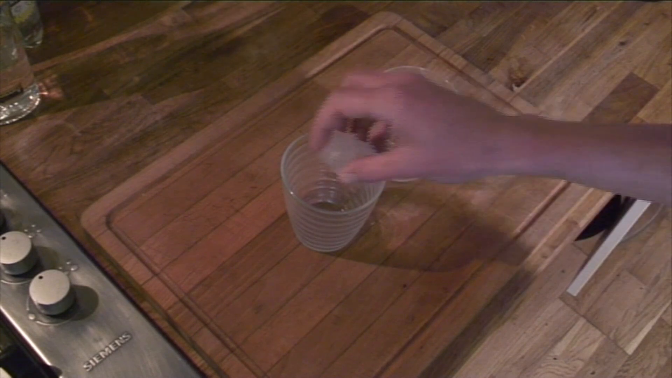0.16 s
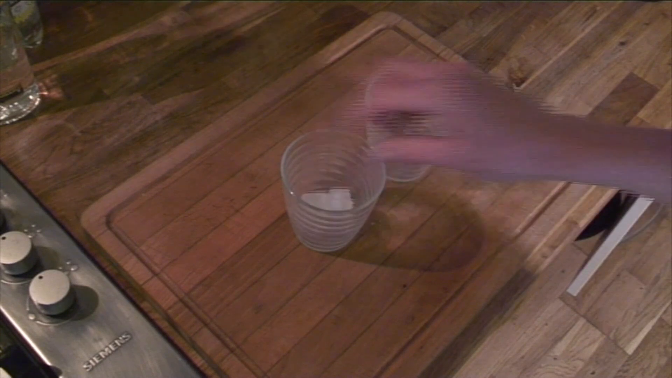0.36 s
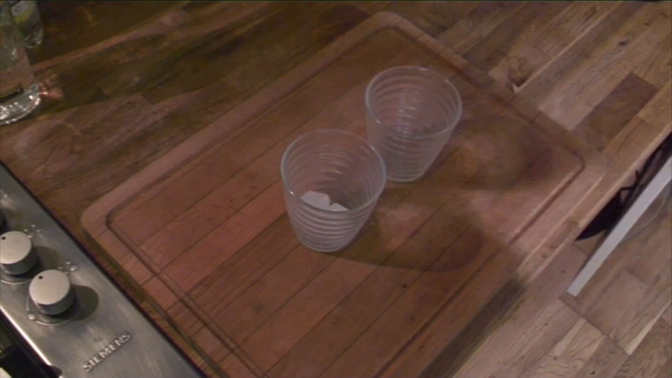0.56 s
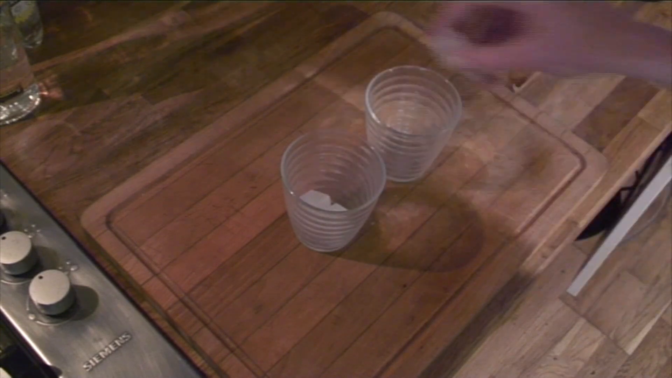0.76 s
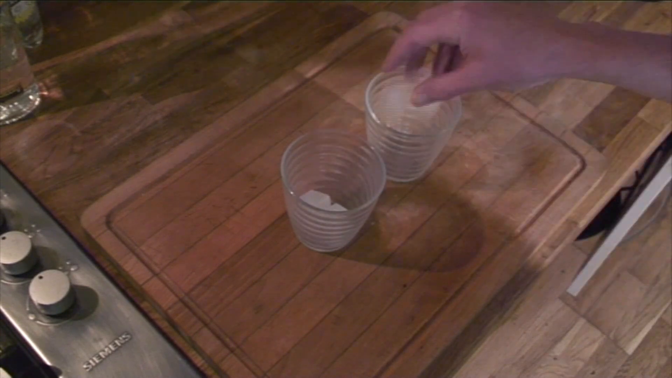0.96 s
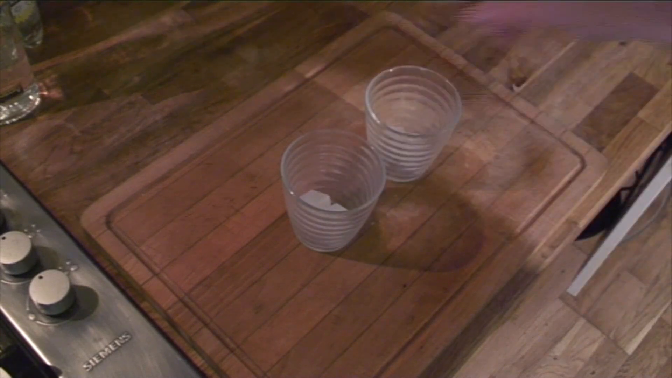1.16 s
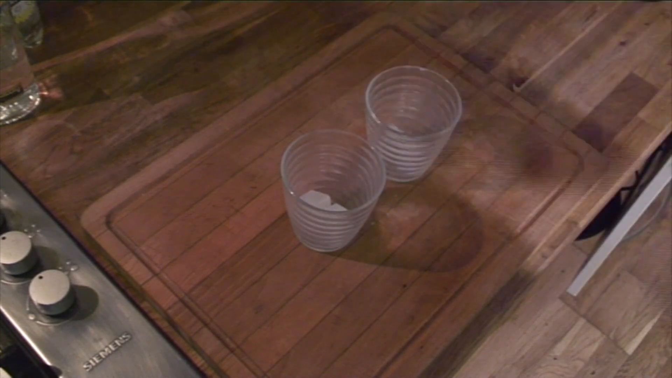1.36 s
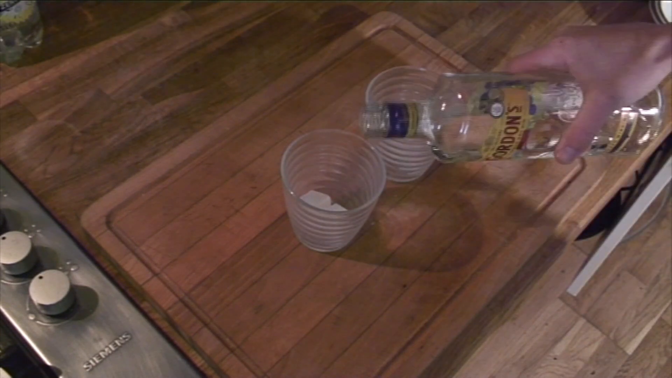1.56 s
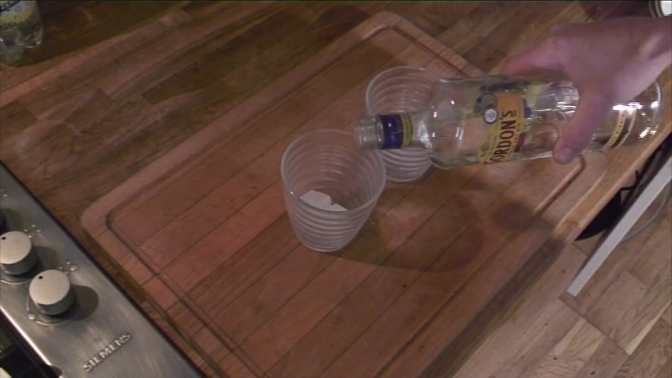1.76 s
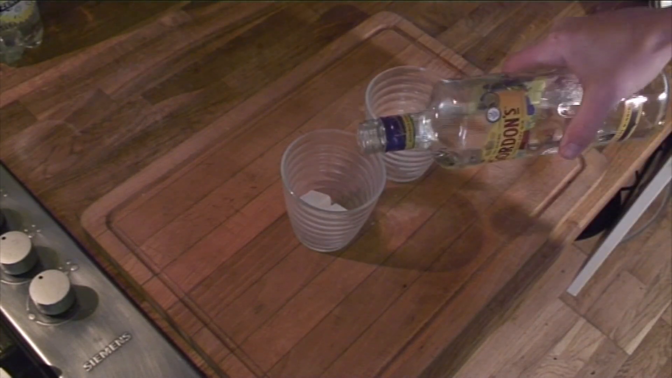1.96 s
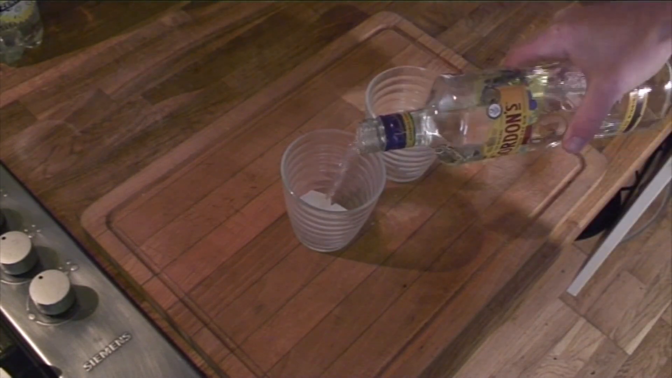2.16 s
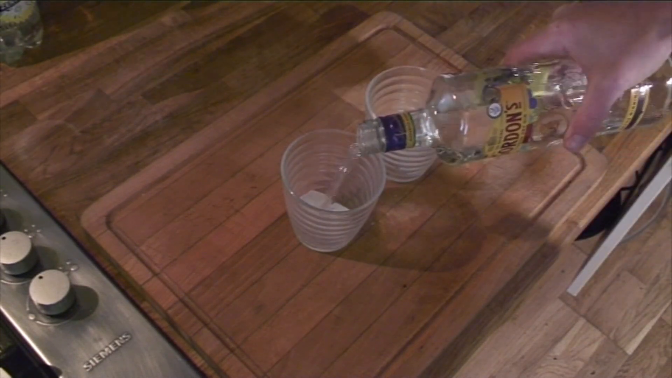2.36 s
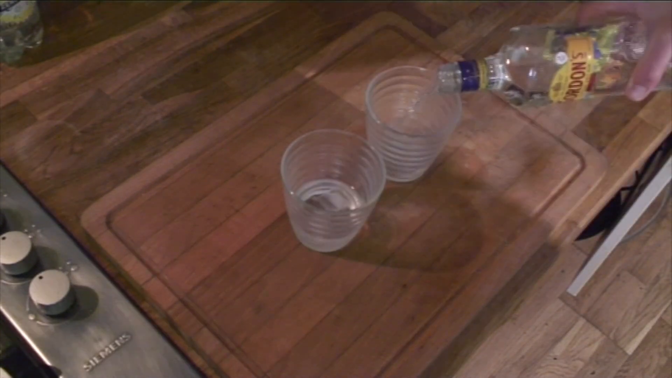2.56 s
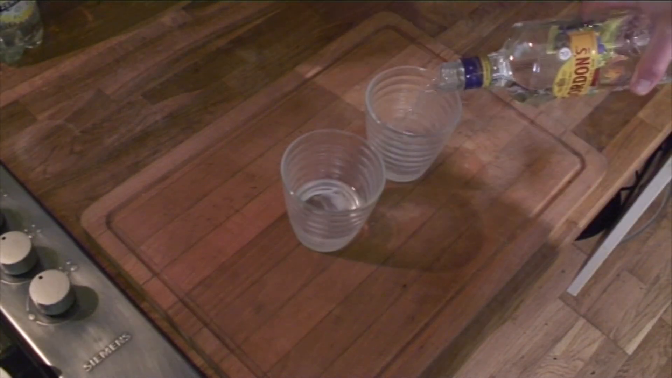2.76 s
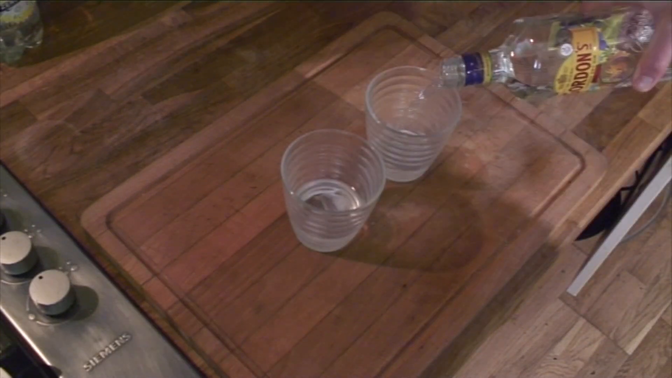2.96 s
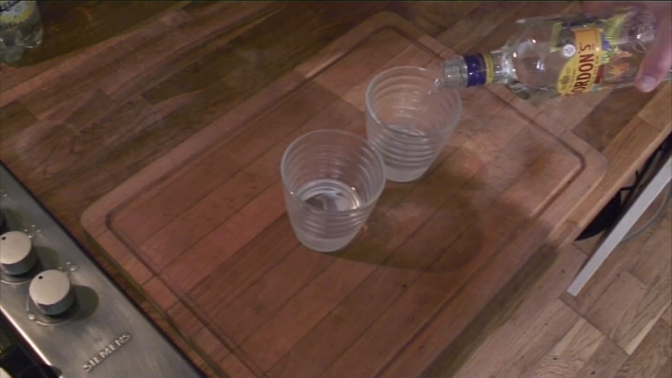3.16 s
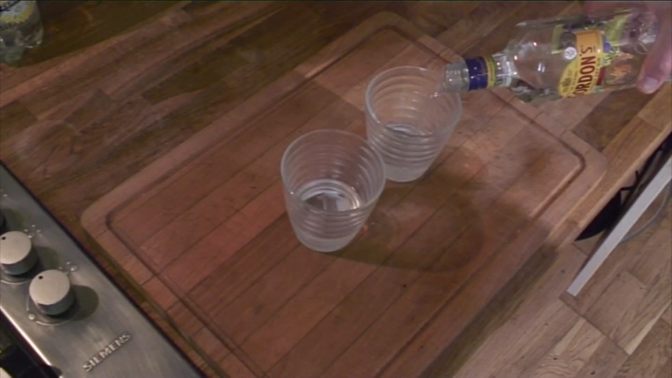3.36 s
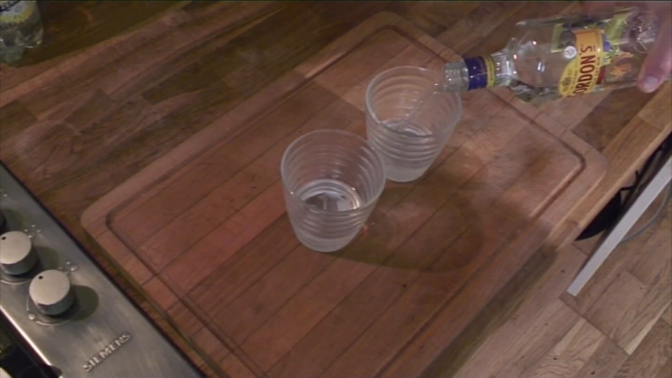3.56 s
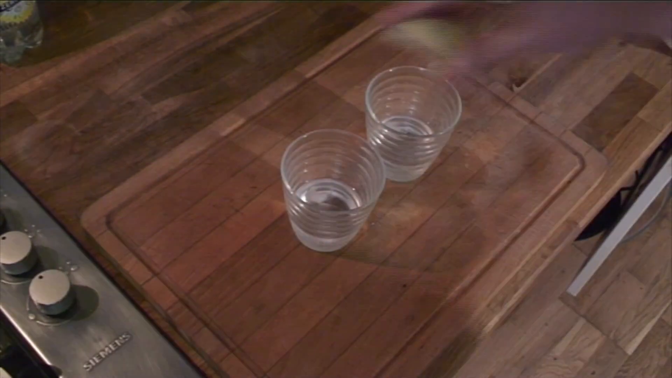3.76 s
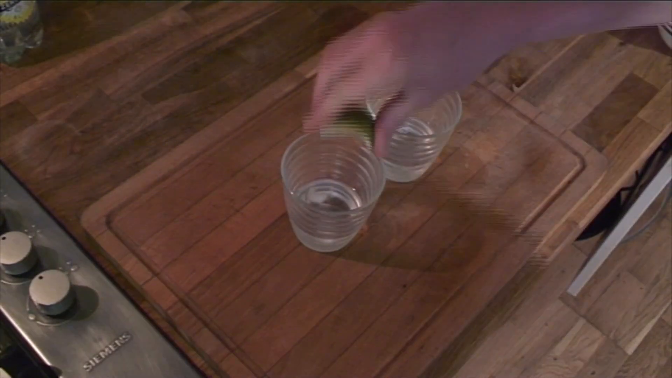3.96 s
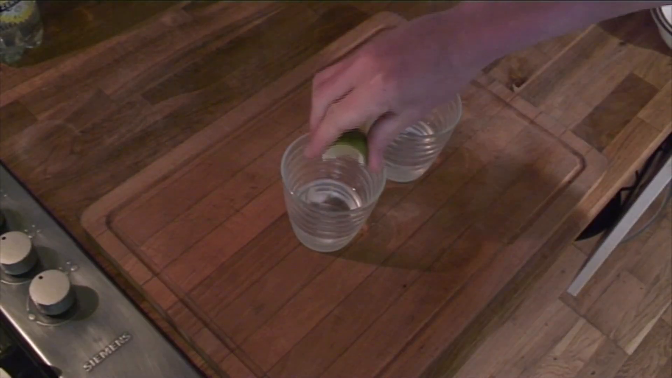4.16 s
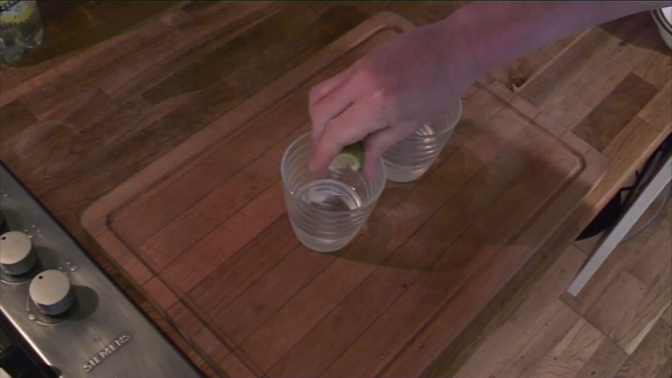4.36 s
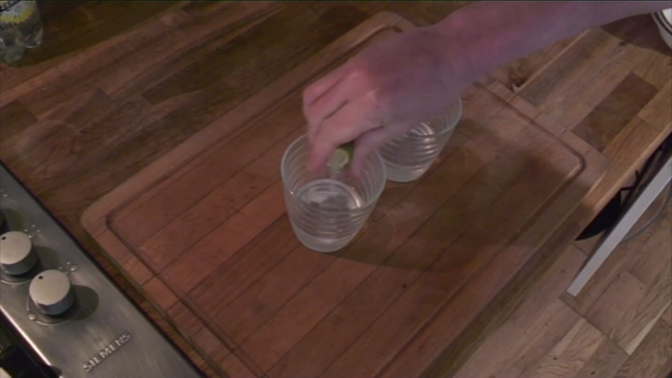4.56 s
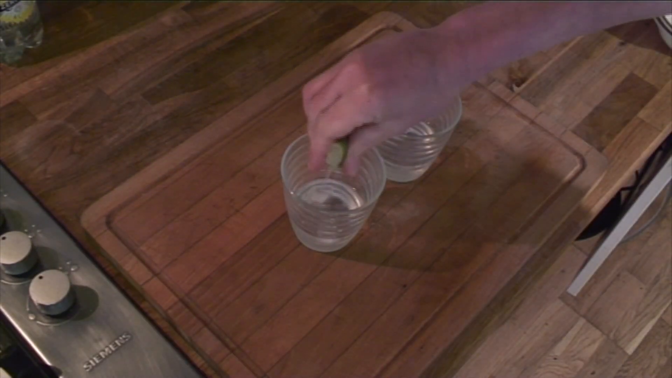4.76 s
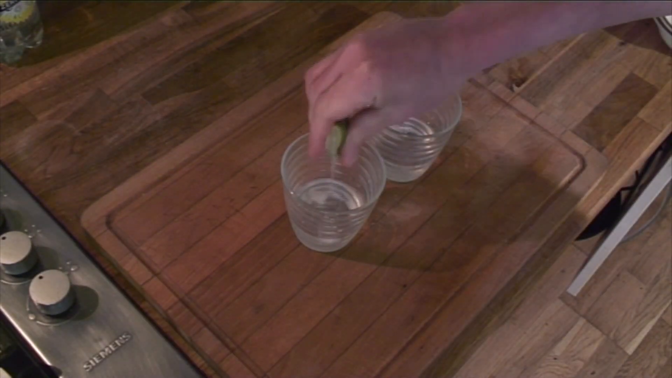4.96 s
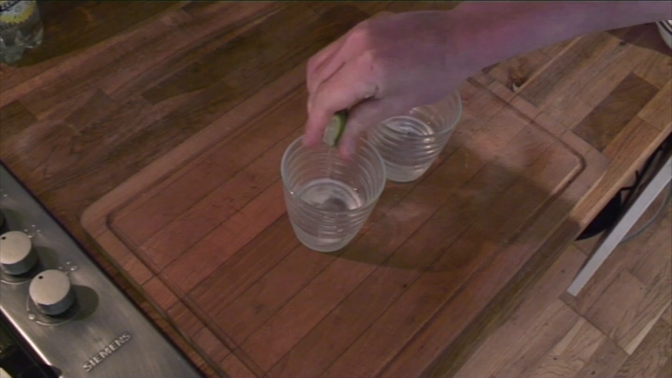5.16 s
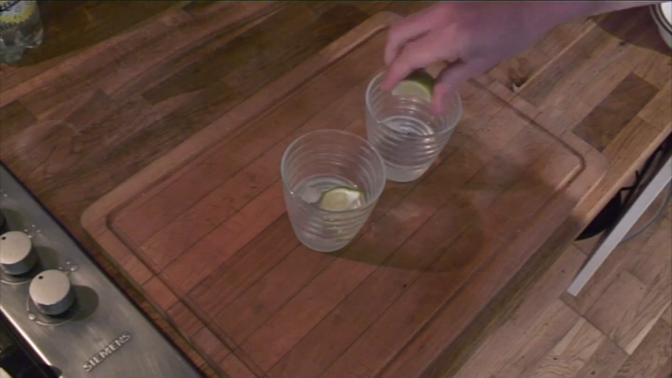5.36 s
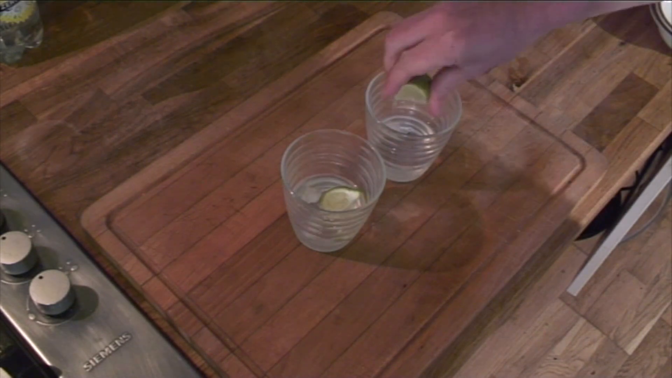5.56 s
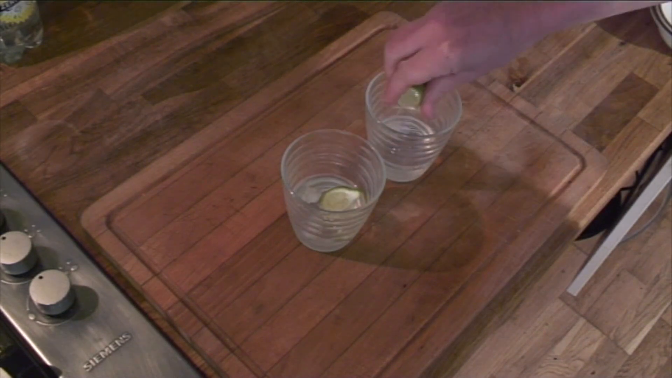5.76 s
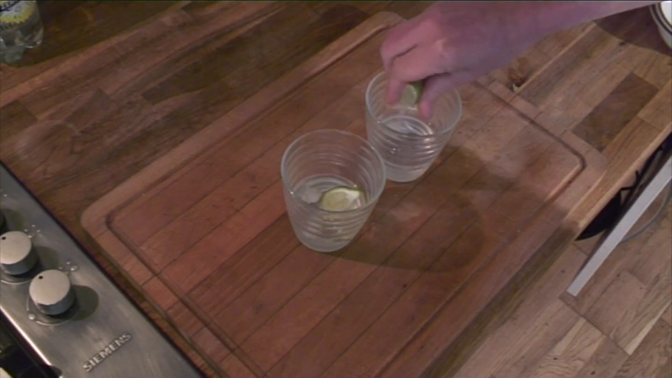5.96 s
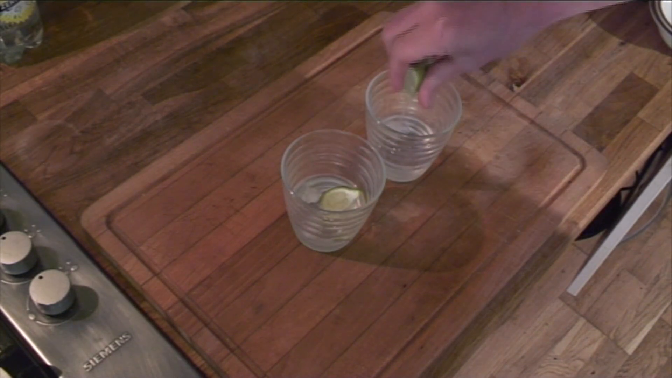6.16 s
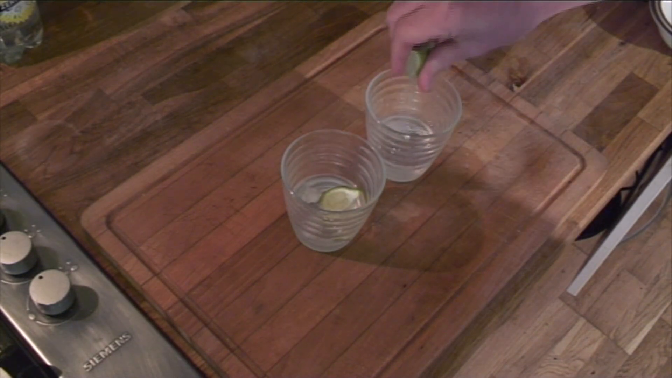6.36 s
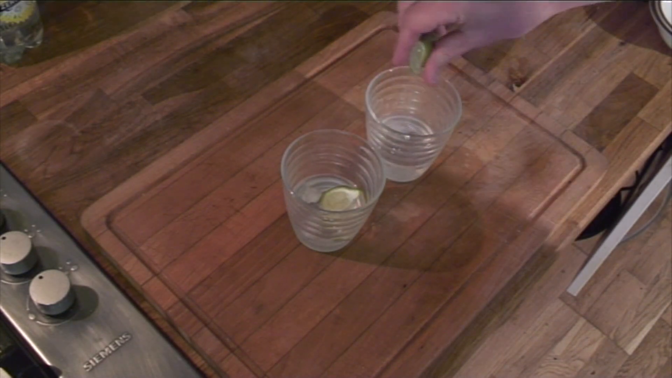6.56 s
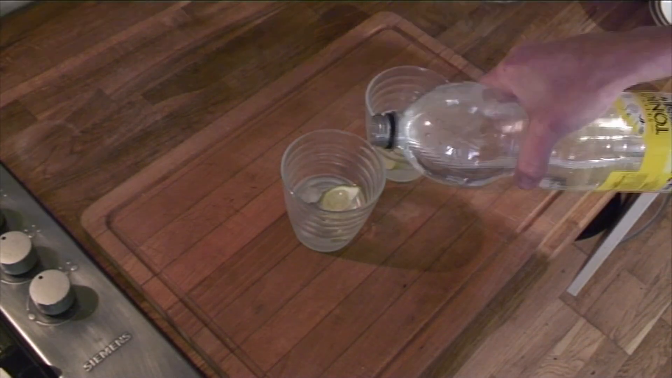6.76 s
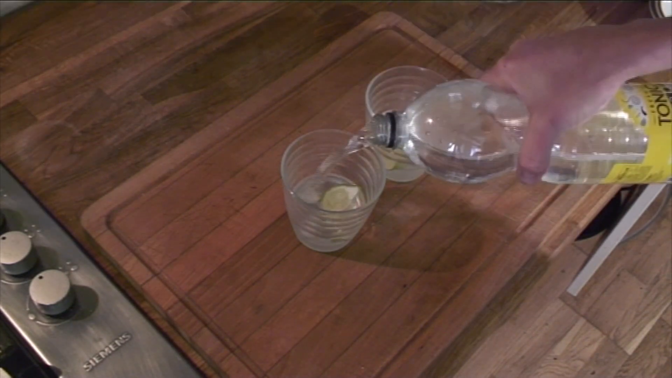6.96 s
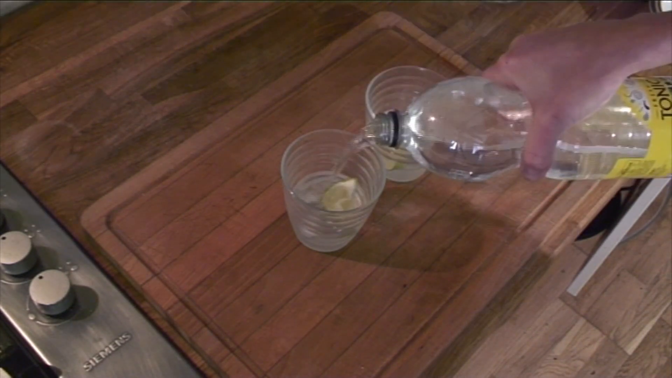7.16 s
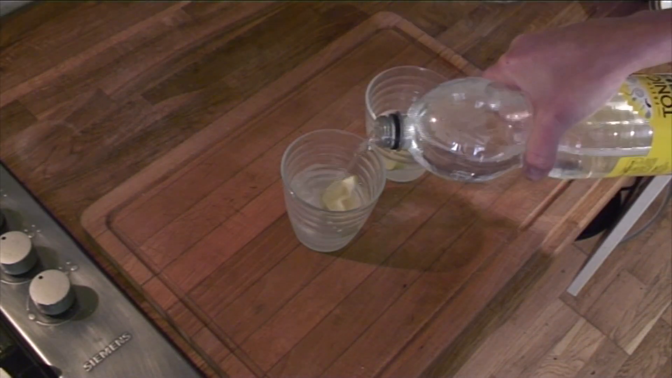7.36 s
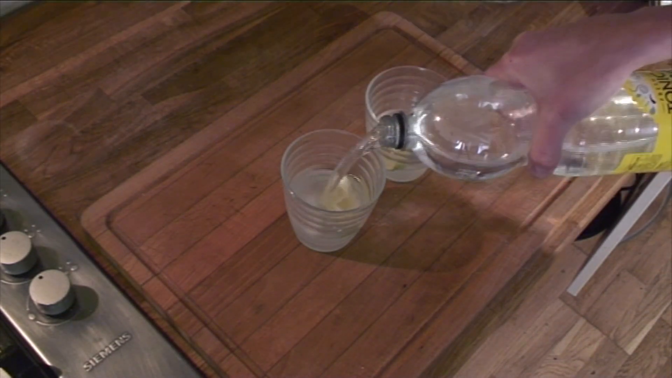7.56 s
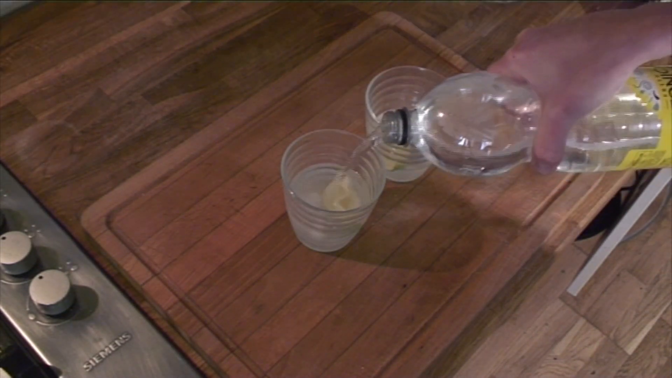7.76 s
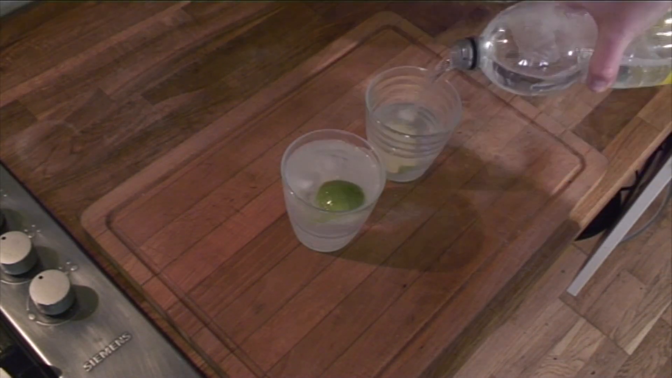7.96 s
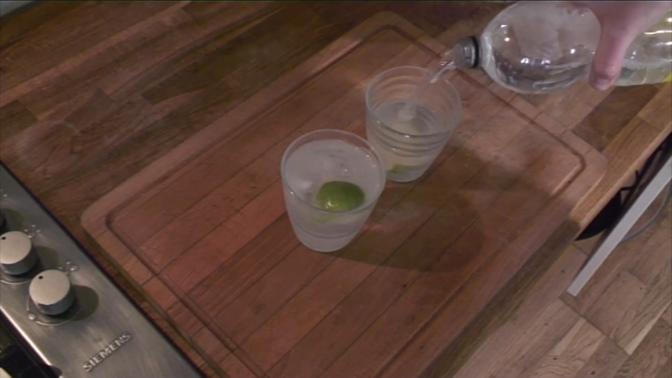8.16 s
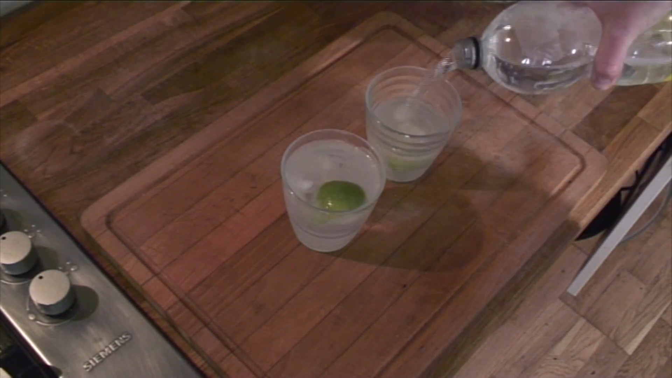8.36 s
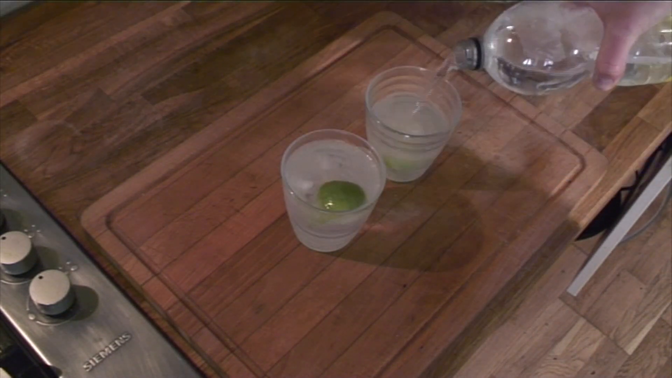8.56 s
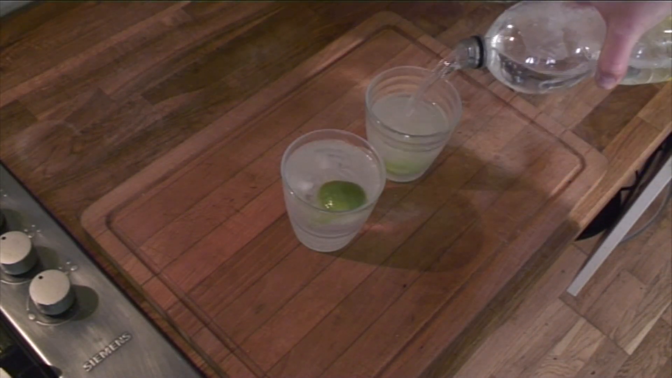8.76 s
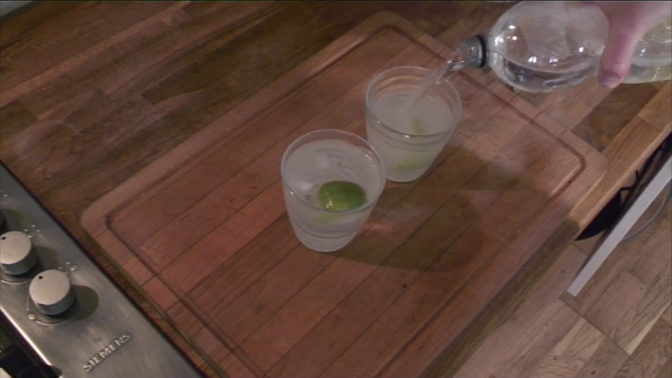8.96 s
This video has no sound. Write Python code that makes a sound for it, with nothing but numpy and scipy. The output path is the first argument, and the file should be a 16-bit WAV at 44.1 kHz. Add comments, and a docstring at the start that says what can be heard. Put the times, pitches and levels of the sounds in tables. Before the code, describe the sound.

Close in a small kitchen with a steady low fan rush and hum, ice rattles into one glass tumbler, then another, with bright, abruptly cut ringing. A bottle knocks twice on glass. Thin liquid trickles, soft scuffs and tiny wet lime ticks follow, then tonic gulps loudly into the first glass with fizz, and more gently into the second.

```python
"""Two drinks are mixed on a wooden board in a kitchen, heard close, over an appliance's rush and hum.
Ice cracks and rings the modes of the front tumbler, then the rear; a bottle knocks twice on the rear one.
Spirit trickles in as a swarm of bubbles, lime squirts in sparse ticks, and soft scuffs sound further off.
Last, two pours of tonic gulp, gurgle in the hollow glass and fizz; the second starts with a rising whistle.
One kitchen's echoes surround all but the appliance."""
import sys
import numpy as np
from scipy import signal
from scipy.fft import rfft, irfft
from scipy.io import wavfile

SR = 44100
rng = np.random.default_rng(int(sys.argv[2]) if len(sys.argv) > 2 else 0)


def inscribe(sig):
    """Save sig as 16-bit PCM at rate SR to the path in sys.argv[1].

    A 1-D sig is mono; a 2-D sig holds one channel per row.
    Samples are clipped to [-1, 1] before scaling.
    """
    pcm = np.round(np.clip(np.atleast_2d(sig).T, -1, 1) * 32767)
    wavfile.write(sys.argv[1], SR, pcm.astype(np.int16))


N = 401310
TIME = np.arange(N) / SR
RING = TIME[:SR // 2]  # the half second that any ring or room tail is given

# the bottle bumps the rear tumbler; all levels relative:
# [t/s, knock level/dB, crack level/dB, ring level/dB, ring brightness/dB per octave]
BOTTLE_KNOCKS = [(1.7901, 0, -20, -21, -4.5), (1.8860, 1, -15, -19, -4.5)]
# gulps of tonic slap into the glass: [t/s, peak level of the bubble/dB, f/Hz]
GULPS = [(7.186, -27, 1740), (7.329, -22.5, 1220), (7.335, -22, 900), (7.355, -31, 960), (7.435, -29, 1200),
         (7.581, -19, 1200), (7.586, -24, 890), (7.698, -32, 1340), (7.721, -27.5, 1560),
         (7.778, -27, 1260), (7.8597, -18.5, 1420), (7.8745, -24, 1350), (8.645, -24, 1200),
         (8.679, -27, 1760), (8.836, -32, 1380), (9.005, -34.5, 860), (9.031, -28.5, 1540)]
# resonances of the air in the tumbler: [f/Hz, relative level/dB, time to fade by 60 dB/s]
CAVITY = [(897, -10, 0.14), (1317, -35, 0.14), (1630, -7, 0.11), (2940, -19, 0.046), (3812, -29, 0.083)]


def undb(db):
    """Decibels to gain."""
    return 10 ** (np.asarray(db) / 20)


def unit(x):
    """Scale to rms 1."""
    return x / np.sqrt(np.mean(x ** 2))


def add(out, s, x):
    """Mix x into out from time s."""
    i = int(np.clip(s * SR, 0, len(out) - 1))
    out[i:i + len(x)] += x[:len(out) - i]


def highpass(x, hz):
    """Small things radiate little bass."""
    return signal.sosfilt(signal.butter(2, hz, "high", fs=SR, output="sos"), x)


def along(points, hz):
    """Read (Hz, value) points on a log-frequency axis."""
    f, value = np.transpose(points)
    return np.interp(np.log(np.maximum(hz, 1)), np.log(f), value)


def tint(x, colour):
    """Give x a spectral colour; rms 1."""
    gain = undb(along(colour, np.fft.rfftfreq(len(x), 1 / SR)))
    return unit(irfft(rfft(x) * gain, len(x)))


def pulse(colour, size=1024):
    """The shortest causal (minimum-phase) pulse with this spectrum; peak 1."""
    cepstrum = irfft(np.log(undb(along(colour, np.fft.rfftfreq(size, 1 / SR)))))
    # fold the cepstrum onto positive time
    cepstrum[1:size // 2] *= 2
    cepstrum[size // 2:] = 0
    x = irfft(np.exp(rfft(cepstrum)))
    return x / np.abs(x).max()


def modes(table):
    """One exponentially fading sine for each row of frequency, level and 60 dB fading time."""
    hz, db, t60 = np.transpose(table)[:, :, None]
    fade = np.exp(-np.log(1000) * RING / t60)
    return undb(db) * np.sin(2 * np.pi * hz * RING) * fade


def bubble(hz, cycles, glide=.08, swell=.04):
    """A bubble swells as it pinches off and rings, its pitch rising as it nears the surface; peak 1."""
    # age 1 is where it has faded by 60 dB
    age = np.arange(int(cycles * SR / hz) + 2) * hz / SR / cycles
    tone = np.sin(2 * np.pi * cycles * age * (1 + glide * age / 2))
    x = tone * np.exp(-np.log(1000) * age) * (1 - np.exp(-age / swell)) ** 2
    return x / np.abs(x).max()


def flow(pours, taper_db):
    """Gain of running liquid: each pour swells to its fullest and thins out again."""
    gain = np.zeros(N)
    for start, full, end, db in pours:
        level = np.interp(TIME, [start, full, end], [db - taper_db, db, db - taper_db])
        gain += undb(level) * (TIME > start) * (TIME < end)
    return gain


def swarm(pours, gain, low_hz, high_hz, cycles, spread_db, count):
    """Many small bubbles of random time, pitch, size and life, shaped by the gain of the flow."""
    start, length = pours[0][0], pours[-1][2] - pours[0][0]
    out = np.zeros(N)
    for when, pitch, size, life in rng.random((count, 4)):
        x = bubble(low_hz * (high_hz / low_hz) ** pitch, cycles * (.5 + life))
        add(out, start + when * length, undb(spread_db * size ** 3) * x)
    # allow for the silence outside the pours
    return unit(out) * np.sqrt(length / TIME[-1]) * gain


def room_tail():
    """Diffuse kitchen reverberation: noise bands that each fade at their own rate; energy 1."""
    # [f/Hz, relative level/dB, time to fade by 60 dB/s]
    room_bands = [(150, -4.5, 0.373), (500, -2, 0.44), (1200, 3, 0.3), (3000, -1, 0.38), (6800, -5, 0.19),
                  (14000, -3, 0.2)]
    centres = np.transpose(room_bands)[0]
    f = np.fft.rfftfreq(len(RING), 1 / SR)
    noise = rfft(rng.standard_normal(len(RING)))
    tail = np.zeros(len(RING))
    for hz, db, t60 in room_bands:
        share = along(np.c_[centres, centres == hz], f)  # overlapping triangular bands
        band = irfft(noise * share, len(RING))
        tail += undb(db) * band * np.exp(-np.log(1000) * RING / t60)
    tail *= 1 - np.exp(-RING / 0.0014)
    return tail / np.linalg.norm(tail)


def kitchen(x, tail, echo_db, tail_db, echo_s=.011):
    """Direct sound, a cluster of echoes from worktop and walls, and the room."""
    near = rng.standard_normal(len(RING)) * (RING > .0015) * (RING < echo_s)
    response = undb(tail_db) * tail + undb(echo_db) * near / np.linalg.norm(near)
    response[0] += 1  # direct sound
    return signal.fftconvolve(x, response)[:len(x)]


def appliance(rush_db=-53.5, waver_db=1.2, drift_hz=0.518):
    """A fan's steady rush of coloured noise, with motor hum that wavers slightly in level and pitch."""
    # colour of the rush: [f/Hz, relative level/dB]
    rush_colour = [(25, -11.5), (65, -24.5), (120, -21), (170, -8), (240, -12), (330, -8.5), (600, -8),
                   (1100, -11), (1500, -16), (2800, -26), (5500, -34.5), (14500, -33), (16000, -44.5)]
    # motor hum: [middle f/Hz, middle rms level/dB]
    hum_tones = [(100, -75.5), (200, -67), (300.5, -61), (350, -70.5), (399, -73.5), (801, -66.5),
                 (1000, -66.5), (1099, -66.5)]
    out = undb(rush_db) * tint(rng.standard_normal(N), rush_colour)
    knots = np.linspace(0, TIME[-1], num=40)
    for hz, db in hum_tones:
        swell = np.interp(TIME, knots, rng.standard_normal(len(knots)))
        drift = np.interp(TIME, knots, rng.standard_normal(len(knots)))
        phase = 2 * np.pi * np.cumsum(hz + drift_hz * drift) / SR
        out += np.sqrt(2) * undb(db + waver_db * swell) * np.sin(phase)
    return out


def scuffs(tail, linger_db=-15, linger_s=0.26):
    """Soft rubs of handling further off: noise swells and fades, heard mostly through the room."""
    # [t/s, relative level/dB, rise time/s]
    rubs = [(3.699, -57, 0.04), (3.801, -45, 0.02), (4.29, -59.5, 0.0096), (5.255, -60.5, 0.014),
            (6.546, -55.5, 0.013), (6.67, -63, 0.012)]
    # [f/Hz, relative level/dB]
    rub_colour = [(300, -18), (1000, 1.5), (1800, 2), (3000, 2), (5000, -3.5), (9000, -14), (16000, -27)]
    out = np.zeros(N)
    for s, db, rise in rubs:
        swell = RING / rise * np.exp((1 - (RING / rise) ** 2) / 2)
        linger = undb(linger_db) * np.exp(-RING / linger_s) * np.minimum(RING / rise, 1)
        noise = tint(rng.standard_normal(len(RING)), rub_colour)
        add(out, s, undb(db) * noise * (swell + linger))
    return undb(3.0) * kitchen(out, tail, echo_db=-17, tail_db=-2.5)


def fizz(spread_db=4.0, share=.12):
    """Tiny foam bubbles burst as a dense crackle of random clicks."""
    # level of the bursting foam: [t/s, level/dB]
    foam_level = [(7.0, -88), (7.3, -72), (7.9, -66.5), (7.93, -56.5), (8.7, -59.5), (9.1, -69)]
    # [f/Hz, relative level/dB]
    foam_colour = [(1000, -17.5), (3000, 3), (5000, -0.5), (8000, 0), (11500, 3.5), (14000, -3),
                   (16000, -19.5)]
    s, db = np.transpose(foam_level)
    bursting = rng.random(N) < share  # share of samples that hold a click
    strength = undb(spread_db * np.minimum(rng.exponential(size=N), 6))
    pops = bursting * rng.choice([-1, 1], N) * strength
    return tint(pops, foam_colour) * undb(np.interp(TIME, s, db))


def lime():
    """Juice squirts from the squeezed wedge in sparse ticks of tiny bubbles."""
    # the lime is squeezed over each glass: [start t/s, hardest t/s, end t/s, level at the hardest/dB]
    squeezes = [(4.6, 5.12, 5.35, -66.5), (5.7, 6.2, 6.6, -68)]
    gain = flow(squeezes, taper_db=9)
    return swarm(squeezes, gain, 6000, 14000, cycles=16, spread_db=18, count=110)


def spirit():
    """A thin stream: overlapping bubbles trickle, tiny ones tick."""
    # the bottle is tipped and righted: [start t/s, fullest t/s, end t/s, flow level at the fullest/dB]
    spirit_pours = [(2.35, 3.03, 3.78, -53.5)]
    gain = flow(spirit_pours, taper_db=10.5)
    trickle = swarm(spirit_pours, gain, 1000, 5500, cycles=42, spread_db=16, count=260)
    ticks = swarm(spirit_pours, gain, 4500, 14200, cycles=20, spread_db=22, count=240)
    return undb(-2.0) * trickle + undb(-5.0) * ticks


def drips():
    """Single clear bubbles pinched off by drops and by the stream."""
    # [t/s, peak level/dB, f/Hz]
    plops = [(2.573, -38, 2600), (2.707, -36, 2590), (2.731, -39, 2510), (2.863, -33, 2500),
             (2.906, -39, 2410), (3.06, -39.5, 880), (3.10, -37.5, 965), (3.13, -35.5, 980),
             (3.211, -34.5, 3320), (3.31, -25, 11070), (3.697, -38, 1410), (3.699, -36, 4760),
             (3.718, -33, 3720), (4.836, -35, 1670), (4.888, -41, 1684), (5.043, -36.5, 2940),
             (5.137, -36, 4280), (5.837, -30.5, 11570), (6.266, -41, 5300), (6.457, -44, 2090),
             (7.118, -35.5, 7320), (7.1795, -22.5, 2020), (7.246, -26.5, 1240), (8.289, -35, 1250),
             (8.313, -36, 1440), (8.394, -31, 1605), (8.801, -22.5, 1340), (8.872, -33, 1460),
             (8.911, -31.5, 1577)]
    out = np.zeros(N)
    for s, db, hz in plops:
        add(out, s, undb(db) * bubble(hz, cycles=25, glide=0.067, swell=0.061))
    return out


def splashes(count=16, octaves=1.51, cycles=24):
    """A stream or squirt breaks up into a quick burst of small bubbles around one pitch, late ones weaker."""
    # [t/s, level of the earliest bubbles/dB, middle f/Hz, mean delay/s]
    bursts = [(2.4685, -39.5, 3000, 0.0024), (2.763, -38, 3800, 0.017), (3.045, -42, 3460, .025),
              (3.694, -38, 4450, .025), (5.135, -42, 11200, 0.0081), (6.392, -45, 7600, 0.0022),
              (7.173, -35, 2890, 0.0072), (7.422, -35.5, 4400, 0.011), (7.512, -38, 3130, .01),
              (7.699, -40.5, 3500, 0.0048), (7.72, -37, 3570, 0.0033), (8.571, -39, 5670, 0.014),
              (8.635, -32.5, 3470, .01)]
    out = np.zeros(N)
    for s, db, hz, delay in bursts:
        for late, pitch in rng.random((count, 2)):
            x = bubble(hz * 2 ** (octaves * (pitch - .5)), cycles)
            add(out, s - delay * np.log(1 - late), undb(db) * (1 - late / 2) * x)
    return out


def thin_stream(from_hz=2250, to_hz=3750, width_hz=220, db=-54):
    """The first thread of tonic sings a rising, airy note in the second glass: a glide blurred by noise."""
    # [start t/s, end t/s]
    whistle_span = (8.13, 8.39)
    progress = np.interp(TIME, whistle_span, [0, 1])
    lowpass = signal.butter(2, width_hz, fs=SR, output="sos")
    waver = unit(signal.sosfilt(lowpass, rng.standard_normal(N)))
    phase = 2 * np.pi * np.cumsum(from_hz + (to_hz - from_hz) * progress) / SR
    return undb(db) * waver * np.sin(phase) * np.sqrt(np.abs(np.sin(np.pi * progress)))


def gulps(count=14, scatter_s=.009, low_hz=1900, octaves=2.44, build_s=0.0013, spray_db=-24.5):
    """A gulp traps a big, quickly damped bubble, rings the air in the glass and throws small bubbles."""
    out = np.zeros(N)
    cavity = modes(CAVITY).sum(0) * (1 - np.exp(-RING / build_s))
    for s, db, hz in GULPS:
        add(out, s, undb(db) * bubble(hz, cycles=11.6, glide=0.091, swell=0.059))
        add(out, s, undb(db - 2.5) * cavity)
        for late, pitch, size in rng.random((count, 3)):
            x = bubble(low_hz * 2 ** (octaves * pitch ** 2), cycles=35)
            add(out, s - scatter_s * np.log(1 - late), undb(db + spray_db) * size * x)
    return out


def churn(level_db=-19, fade_s=0.021, lead_s=0.015):
    """Gain of the gurgle that builds as a gulp arrives and then settles; level against the gulp."""
    out = np.zeros(N)
    shape = np.minimum(RING / lead_s, 1) * np.exp(-np.maximum(RING - lead_s, 0) / fade_s)
    for s, db, _ in GULPS:
        add(out, s - lead_s, undb(db + level_db) * shape)
    return out


def tonic():
    """A thick stream: large bubbles gurgle and ring the air in the glass, a fine spray spatters."""
    # the bottle is tipped and righted: [start t/s, fullest t/s, end t/s, flow level at the fullest/dB]
    tonic_pours = [(7.14, 7.42, 7.73, -42.5), (8.15, 8.66, 9.15, -48)]
    gain = flow(tonic_pours, taper_db=10)
    gurgle_gain = np.hypot(gain, churn())
    gurgle = swarm(tonic_pours, gurgle_gain, 760, 2100, cycles=22, spread_db=10, count=520)
    cavity = modes(CAVITY).sum(0)
    hollow = signal.fftconvolve(gurgle, cavity / np.abs(rfft(cavity)).max())[:N]
    spatter = swarm(tonic_pours, gain, 2200, 6400, cycles=26, spread_db=17, count=600)
    mist = swarm(tonic_pours, gain, 6100, 13800, cycles=26, spread_db=20, count=450)
    return undb(-1.5) * gurgle + undb(2.5) * hollow + undb(-9.5) * spatter + undb(-11) * mist


def contacts():
    """Each kind of contact shares its force in its own way; rows laid out like BOTTLE_KNOCKS."""
    # ice glances off the wall and rings it: [t/s, relative ring level/dB, brightness/dB per octave]
    wall_taps = [(.4576, -26.5, -1), (.4898, -32, 7.5), (.5171, -13, 0), (.6454, -26.5, -4.5),
                 (1.1551, -35.5, 4.5), (1.1728, -28.5, -0.5), (1.2117, -38, 6), (1.2419, -42, 7.5)]
    # ice lands or bounces on the bottom: [t/s, relative crack level/dB, relative knock level/dB]
    ice_hits = [(0.4657, -25.5, -50), (0.4929, -2, -21), (0.4991, -6.5, -25), (0.5015, -6, -20),
                (0.5029, -3, -8.5), (0.5303, -13.5, -22), (0.6183, -15, -16), (0.6659, -18, -23),
                (1.1883, -2.5, 2), (1.2108, -12.5, -21.5), (1.2687, -20.5, -34), (1.3626, -30, -53),
                (1.4612, -24, -15)]
    knock_db, crack_db = -2.5, -7  # of a tap, against the ring one octave above the lowest mode
    taps = [(s, db + tilt + knock_db, db + tilt + crack_db, db, tilt) for s, db, tilt in wall_taps]
    ring_db, tilt_db = -21, -3  # of a hit: ring against the crack, and its slope per octave
    hits = [(s, knock, crack, crack + ring_db, tilt_db) for s, crack, knock in ice_hits]
    return [*taps, *hits, *BOTTLE_KNOCKS]


def blows(rows, glass, tail, end):
    """Each blow cracks, knocks the base on the board and rings the wall; sharper ones favour high modes."""
    # the glass base on the board: [f/Hz, relative level/dB, time to fade by 60 dB/s]
    board_modes = [(580, -18, 0.17), (720, -20, .07), (805.5, -11, 0.028), (859, -18.5, 0.087),
                   (943, -9.5, 0.12), (1074, -2.5, 0.043), (1170, -20, 0.025), (1471, -14, 0.097),
                   (2000, -27, 0.031)]
    # short pulse of a heavy knock: [f/Hz, relative level/dB]
    thud_colour = [(40, -51), (200, -20), (450, -14.5), (800, -0.5), (1100, -1.5), (1700, -13), (2500, -22),
                   (5000, -32.5), (9000, -45), (16000, -59.5)]
    # sharp ice contact: [f/Hz, relative level/dB]
    crack_colour = [(100, -42.5), (600, -19), (1500, -2), (2700, 2.5), (4300, 1.5), (6400, -7.5),
                    (9000, -13), (12000, -17), (16000, -28.5)]
    thump = pulse(thud_colour)
    thump = np.pad(thump, (0, len(RING) - len(thump)))
    knock = highpass(thump + undb(-8.5) * modes(board_modes).sum(0), 360)
    wall = highpass(modes(glass) * (1 - np.exp(-RING / 0.00073)), 620)
    wall_hz = np.transpose(glass)[0]
    octaves_up = np.log2(wall_hz / wall_hz[0])
    thuds, cracks, ring = np.zeros((3, int(end * SR)))
    for s, knock_db, crack_db, ring_db, tilt_db in rows:
        chips = tint(rng.standard_normal(size=1024), crack_colour)
        add(cracks, s, undb(crack_db - 4) * chips * np.exp(-RING[:len(chips)] / 0.0019))
        add(thuds, s, undb(knock_db - 3.5) * knock)
        add(ring, s, undb(ring_db + tilt_db * octaves_up) @ wall)
    out = kitchen(thuds, tail, echo_db=-2.5, tail_db=-10.5)
    out += kitchen(cracks, tail, echo_db=-10, tail_db=-7)
    out += kitchen(ring, tail, echo_db=-15.5, tail_db=-12.5)
    return np.pad(out, (0, N - len(out)))  # sound and room stop dead at the end time


def tumblers(tail):
    """Ice in the front glass, ice in the rear, bottle on the rear; each group's ringing is cut off short."""
    # wall modes with split pairs: [f/Hz, relative level/dB, time to fade by 60 dB/s]
    front_glass = [(1670, 1.5, 0.42), (2820, -23.5, .18), (3816, -9, .22), (4845, -21, 0.23),
                   (6580, -10.5, 0.058), (9918, -1.5, 0.099), (9970, -6, 0.056), (12100, -28, .12),
                   (14900, -18.5, .16)]
    rear_glass = [(1658, -3.5, 0.38), (1682, -0.5, 0.3), (3815, 0, 0.27), (5140, -31, 0.31),
                  (6510, -13, 0.24), (9800, -19, 0.34), (9900, -5.5, 0.15), (12700, -23.5, 0.16),
                  (14790, -37, .17)]
    # moments when the ringing breaks off: [t/s]
    ring_cuts = [.679, 1.479]
    edges = [0, *ring_cuts, BOTTLE_KNOCKS[-1][0] + 1]
    out = np.zeros(N)
    for start, end, glass in zip(edges, edges[1:], (front_glass, rear_glass, rear_glass)):
        rows = [row for row in contacts() if start < row[0] < end]
        out += blows(rows, glass, tail, end)
    return out


def scene():
    """Glasses, liquid and scuffs share one kitchen; the appliance is added on its own."""
    tail = room_tail()
    liquid = fizz() + lime() + spirit() + drips() + splashes() + thin_stream() + gulps() + tonic()
    liquid = kitchen(highpass(liquid, 620), tail, echo_db=-6, tail_db=-13.5)
    return (appliance() + scuffs(tail) + liquid + tumblers(tail))[None]


def record(dry):
    """Peaks are clipped at full scale, then a steep low-pass cuts the top."""
    top_hz = 15700
    lowpass = signal.ellip(8, .2, 70, top_hz, fs=SR, output="sos")
    return signal.sosfilt(lowpass, np.clip(dry, -1, 1))


dry = scene()
out = record(dry)
inscribe(out)
```